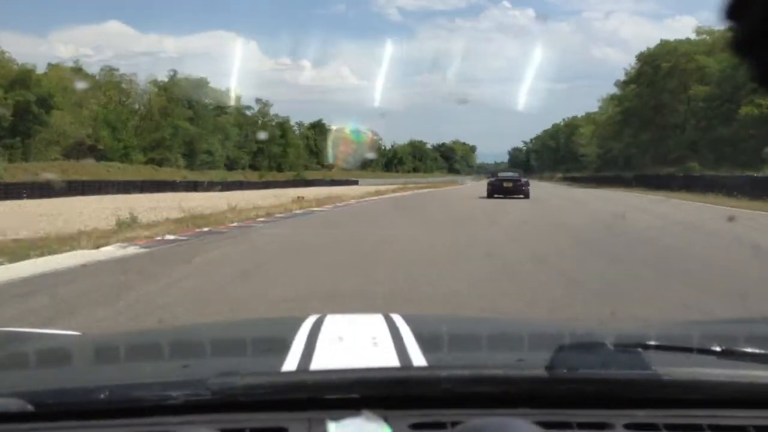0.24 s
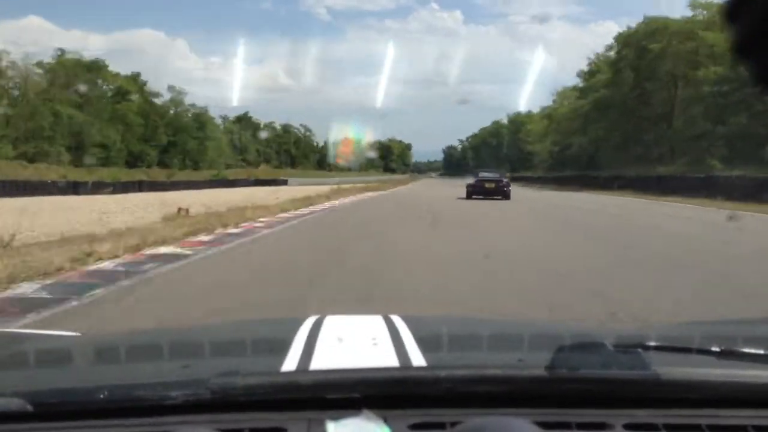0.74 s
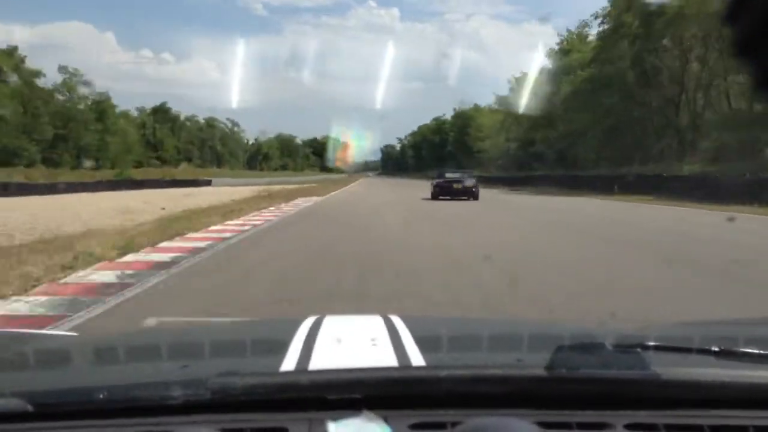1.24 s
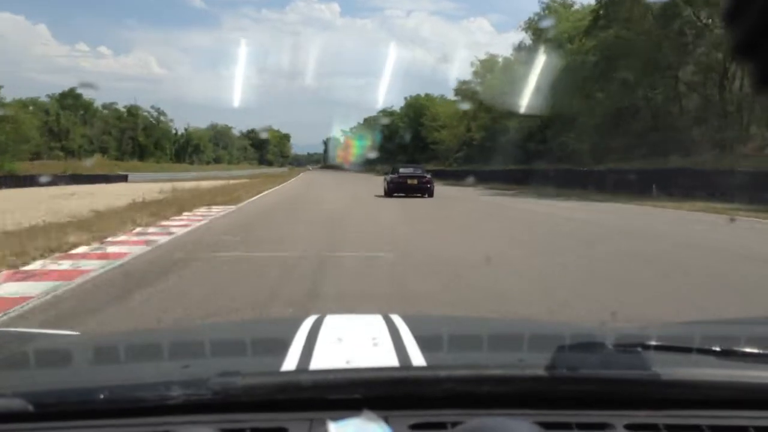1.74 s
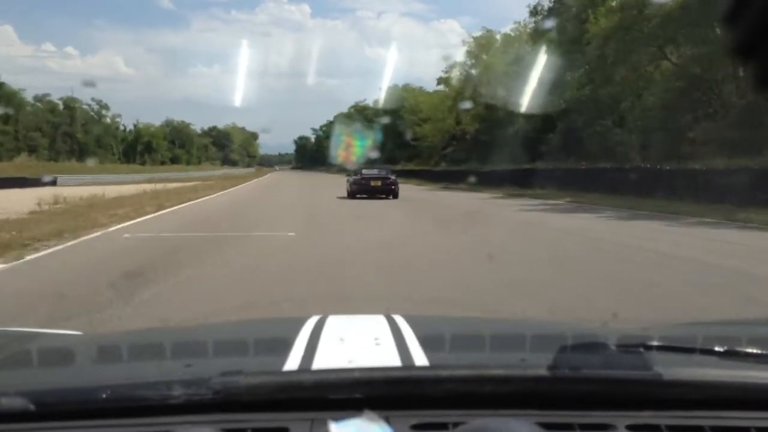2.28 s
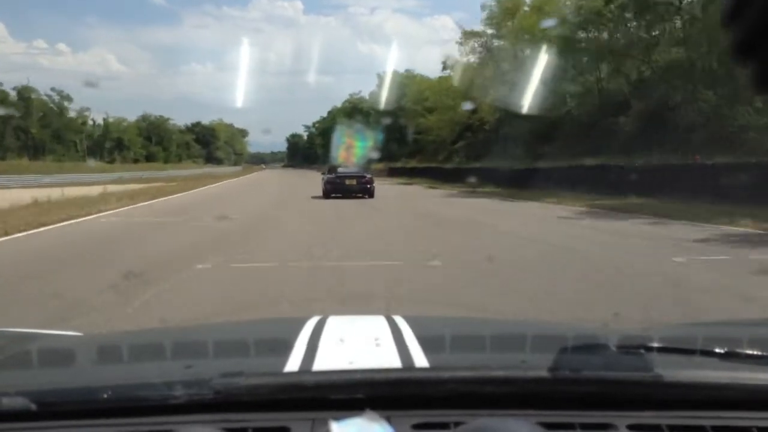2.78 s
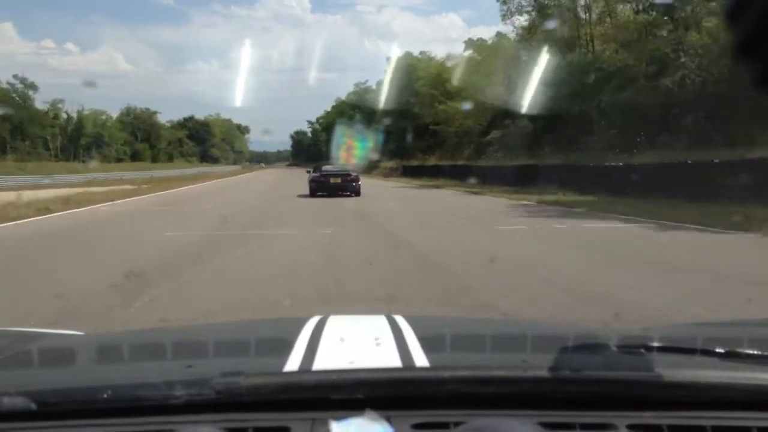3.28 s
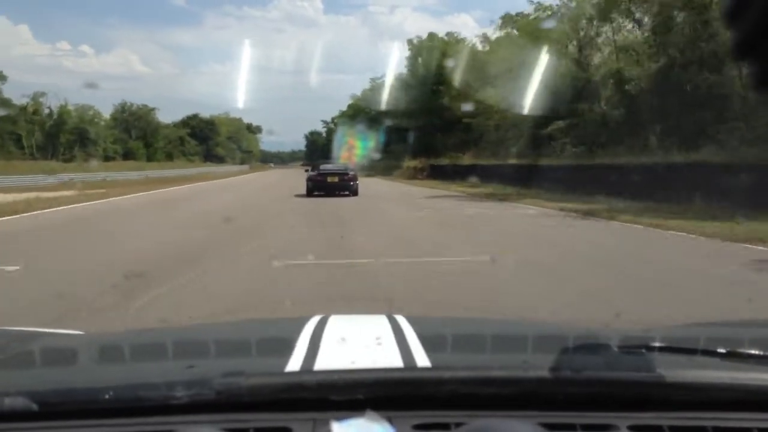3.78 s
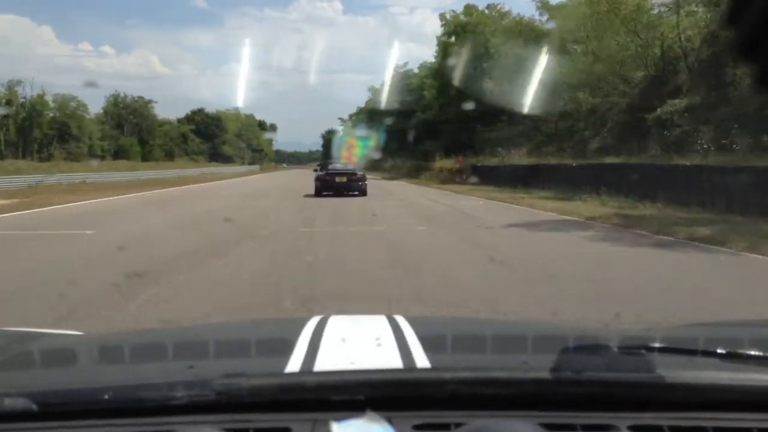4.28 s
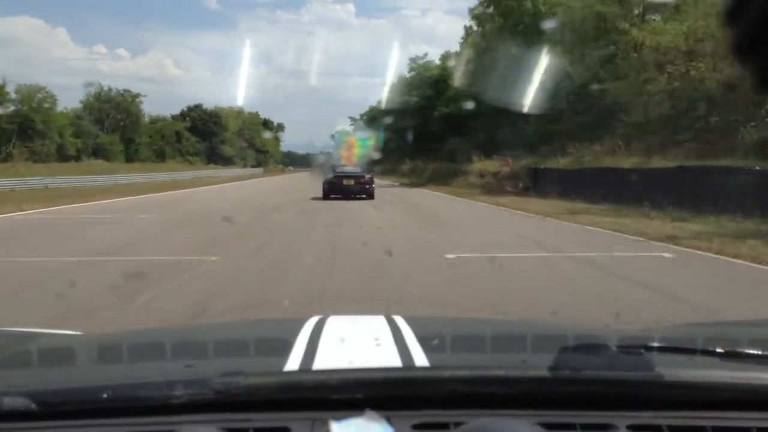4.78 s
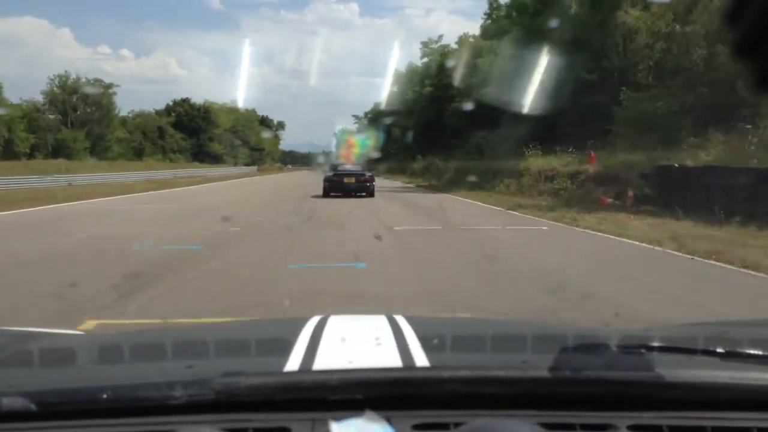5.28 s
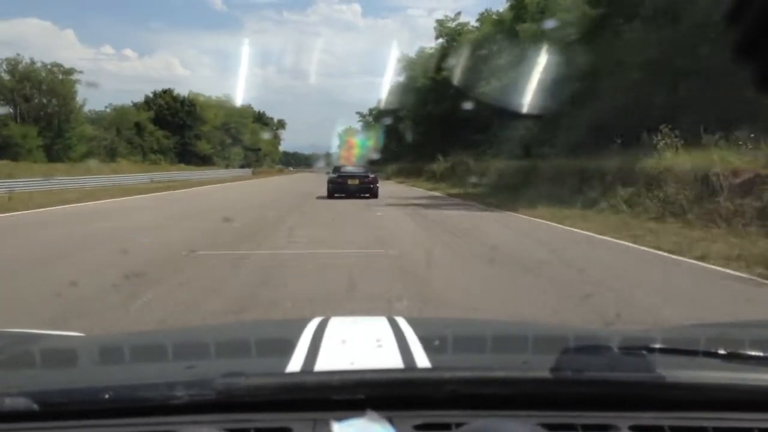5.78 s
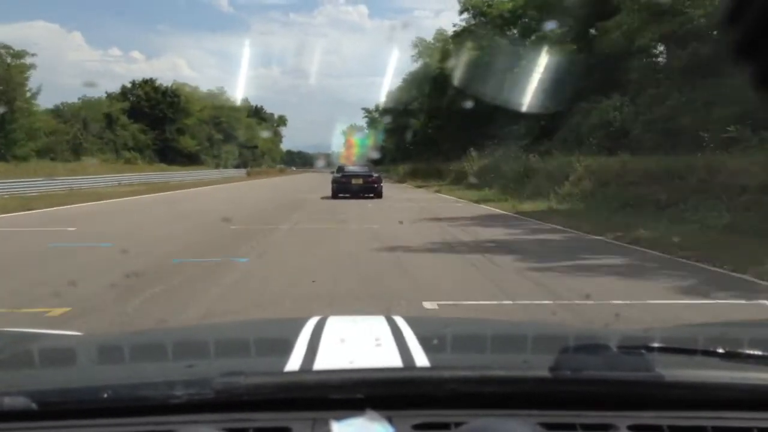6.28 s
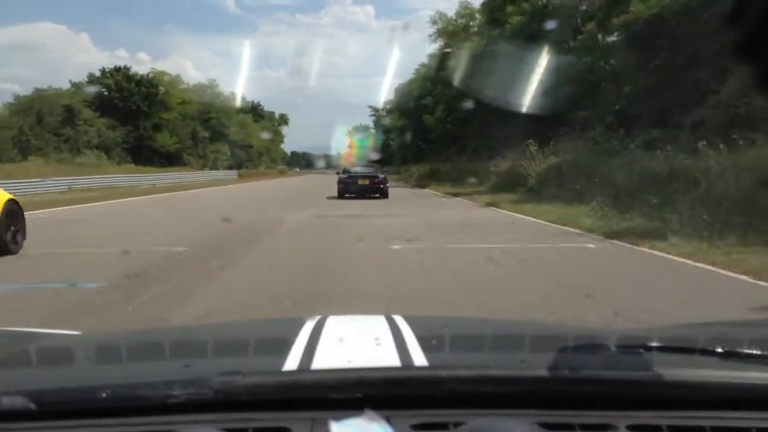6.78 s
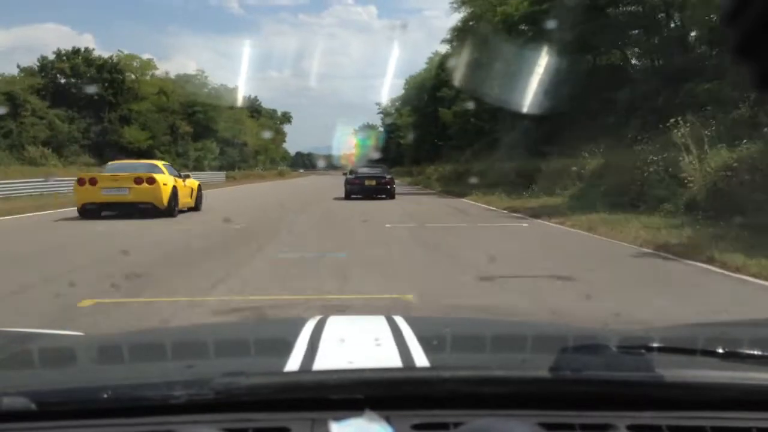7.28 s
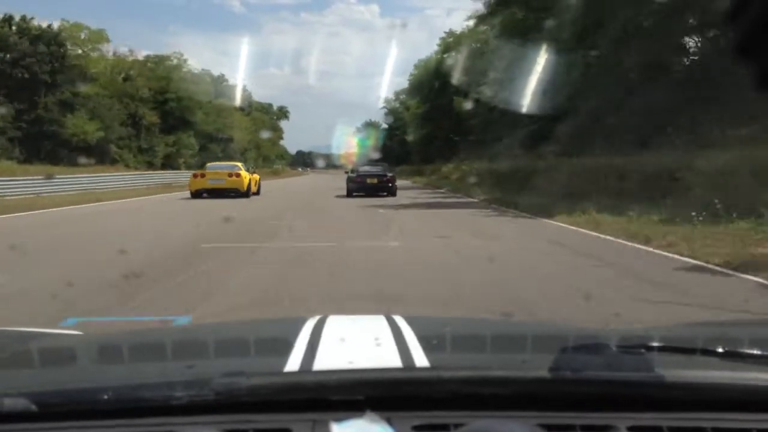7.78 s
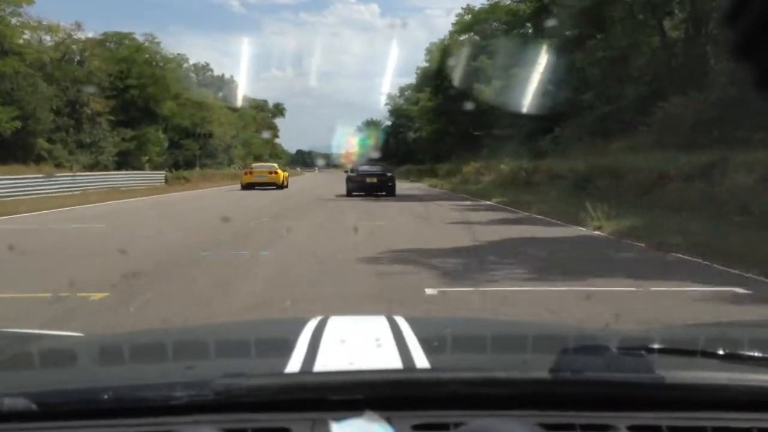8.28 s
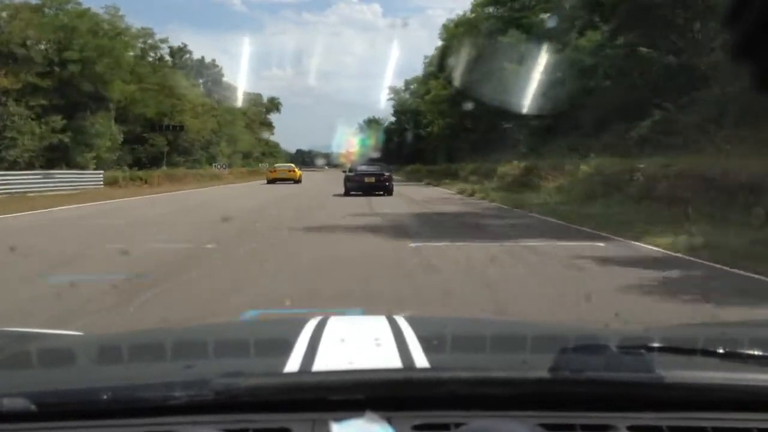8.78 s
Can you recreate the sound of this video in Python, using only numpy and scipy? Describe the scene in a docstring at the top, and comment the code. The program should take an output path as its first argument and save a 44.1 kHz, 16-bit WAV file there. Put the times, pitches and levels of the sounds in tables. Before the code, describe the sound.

Inside a race car, the engine revs high and changes up over tyre rumble and wind, then a V8 roars past and pulls away.

```python
"""A race car's engine, heard from inside: its firing booms at high revs, then it changes up and runs on.
The tyres rumble on the asphalt, wind hisses, whistles and short knocks come and go and loose trim rattles.
A V8 roars past with a rush of air, dropping in pitch. Its driver lifts off, then pulls away in a higher
gear. A limiter turns everything down as the V8 passes and slowly lets the level back up."""
import sys
import numpy as np
from scipy import signal
from scipy.fft import rfft, irfft
from scipy.io import wavfile
from scipy.ndimage import uniform_filter1d, minimum_filter1d

SR = 44100
rng = np.random.default_rng(int(sys.argv[2]) if len(sys.argv) > 2 else 0)


def master(y):
    """Save y as 16-bit WAV."""
    cut = np.clip(np.atleast_2d(y).T, -1, 1)
    pcm = np.round(cut * 32767)  # scale
    wavfile.write(sys.argv[1], SR, pcm.astype(np.int16))


N = 399105
T = np.arange(N) / SR

# road rumble in the cabin (frequency [Hz], relative level [dB])
ROAD_SPECTRUM = [(25, -46), (60, -12.5), (80, -27), (105, -5), (135, -0.5), (165, 5), (200, -4.5),
                 (280, -2), (400, -9), (620, -13), (780, -17), (1100, -17), (1600, -26.5), (3000, -53)]
# stretches of coarser asphalt (start [s], end [s], rise of the tyre hum [dB])
COARSE_ASPHALT = [(2.343, 4.35, 9.5), (5.1, 6.3, 7)]
# wind round the body (frequency [Hz], relative level [dB])
WIND_SPECTRUM = [(400, -19), (1000, -1.5), (1700, 1.5), (2500, -0.5), (3600, -5), (5200, -7), (7800, -10),
                 (9800, -19.5), (12500, -21), (15000, -39)]
# gusts and lulls (time [s], half length [s], level change [dB])
WIND_GUSTS = [(.35, 0.43, 4), (1.57, 0.054, 3), (2.87, 0.094, 3.5), (7.62, 0.13, -1), (7.88, 0.11, 1.5)]
# whistles, squeals, whines and short knocks
# (start [s], end [s], first pitch [Hz], last pitch [Hz], width [Hz], level [dB])
STRAY_TONES = [(0, .35, 11900, 11750, 120, -57), (0.486, .55, 2200, 2210, 18, -35),
               (.5, 1.08, 11700, 11250, 120, -58), (1.16, 1.25, 2593, 2620, 120, -35),
               (1.24, 1.722, 1008, 940, 56, -36.5), (1.505, 1.555, 980, 982, 25, -27),
               (1.545, 1.578, 1290, 1320, 90, -28), (1.833, 1.978, 436, 431, 10.8, -24.5),
               (2.358, 2.4, 900, 860, 110, -29), (2.304, 4.697, 940, 900, 50, -36.5),
               (6.299, 7.8, 1660, 1728, 13, -40.3)]
# the sound of loose trim (frequency [Hz], relative level [dB])
TRIM_SPECTRUM = [(1500, -15), (4000, -2), (7000, 5), (10000, -2), (14000, -4), (15500, -13.5)]
# trim rattles (time [s], level [dB], rise [s], time to fade by 60 dB [s])
TRIM_RATTLES = [(.326, -23.5, 0.0057, 0.11), (.36, -27.5, 0.012, .17), (.427, -42, .006, .15),
                (.741, -30.5, .007, .12), (1.197, -35, 0.0085, 0.18), (3.47, -38, .008, .12),
                (3.551, -43, .003, .08), (4.39, -41, .015, 0.16), (4.558, -40, .003, 0.075),
                (4.692, -38, .003, .06), (5.023, -33, .007, 0.15), (5.162, -43, .008, 0.096),
                (5.223, -30.5, 0.009, 0.13), (7.791, -22, .002, 0.04), (7.858, -32, 0.0032, .05),
                (8.828, -41, 0.0038, 0.11)]

# tones of the V8's intake, exhaust and far drone (multiple of its cycle rate [x], relative level [dB])
INTAKE_TONES = [(3, -9.5), (5, -5.5), (6, -2), (7, -24)]
EXHAUST_TONES = [(4, -2), (8, 3.5), (9, 3.5), (11, -9), (12, 0.5), (13, -19), (16, 1), (17, 1), (21, 0),
                 (22, -19), (25, -10)]
AWAY_TONES = [(4, -15), (5, -2.5), (8, 4), (10, -9.5), (12, -19), (13, -21)]
# the V8's intake roar, exhaust rasp and rushing air (frequency [Hz], relative level [dB])
ROAR_SPECTRUM = [(130, -36), (200, -6), (290, 3.5), (440, -3.5), (700, -25), (1600, -19), (2400, -20),
                 (3400, -41), (6000, -47)]
RASP_SPECTRUM = [(50, -31), (150, -7), (450, -21), (660, 3.5), (810, -3.5), (920, -2), (1080, 1),
                 (1400, -4), (1750, -11.5), (2400, -8.5), (4000, -18), (9000, -23.5)]
RUSH_SPECTRUM = [(800, -15), (2400, -17), (3300, -2), (4200, -3), (5300, 4), (6800, -1), (8500, -5),
                 (10000, -15.5), (12500, -12), (15000, -14)]
# the far drone dips briefly (time [s], half length [s], level change [dB])
DRONE_DIPS = [(8.38, .07, -7.5), (8.79, .03, -7), (8.92, .03, -9)]

# our engine's overtones in three patterns: 0 high revs, 1 taking up the drive, 2 steady pull
# (multiple of the crank's turning rate [x], level in 0 [dB], level in 1 [dB], level in 2 [dB])
ENGINE_OVERTONES = [(3, -34.5, -26.5, -41), (4, -27, -42, -27), (5, -26.5, -42, -45),
                    (6, -30.5, -25.5, -26.5), (7, -35.5, -35.5, -32), (8, -36.5, -31.5, -34.5),
                    (9, -37, -36, -33), (10, -43, -33.5, -38), (11, -40.5, -38, -56),
                    (12, -38.5, -48, -41.5), (13, -42.5, -42, -44), (18, -42, -47, -47)]
# valve clatter and the hiss of air drawn in (frequency [Hz], relative level [dB])
CLATTER_SPECTRUM = [(700, -36), (860, 7), (1030, -9), (1220, 4), (1450, -8), (1650, -1.5), (1900, -13),
                    (2200, -2.5), (2750, -8.5), (3200, -16), (3700, -11), (5000, -28.5)]
# pitches at which the cabin air rings (frequency [Hz], width [Hz], boost [dB])
CABIN_RESONANCES = [(133.5, 34.4, 14.5), (430, 37, 3), (593, 29, 7.5)]
# engine speed in the high gear (time [s], firing rate [Hz])
HIGH_GEAR_SPEED = [(2.0, 101.4), (2.85, 101.6), (4.16, 97.76), (4.5, 97.35), (8.8, 99.42)]
# the driver goes full throttle, lifts for the gear change, presses again, eases, holds and eases again
# (start [s], time taken [s], boom [dB], overtone gain [dB], clatter [dB], overtone pattern [0 to 2])
PEDAL_MOVES = [(-.1, .1, -18.5, 3, -33, 0), (.45, .55, -18.5, 0.5, -34, 0),
               (1.15, .08, -24.5, -12.5, -35, 0), (1.35, 0.49, -26, -15, -45, 0.83),
               (1.9, 0.19, -23.5, 0, -39.5, 1), (2.4, 0.25, -25, -7, -56, 1.25),
               (4.55, 0.36, -26, -.5, -54, 2), (7.9, 0.48, -26.5, -7, -48, 1.85)]
# the boom dips briefly (time [s], half length [s], level change [dB])
ENGINE_DIPS = [(1.216, 0.012, -15), (1.365, 0.065, -6.5), (1.85, .03, -10), (2.88, 0.19, -6),
               (4.34, 0.046, -6)]

SWELL_S, SWELL_HALF_S = 6.87, 0.61  # road and wind noise swell while the limiter turns the sound down
CLUTCH_S, FLARE_S = 1.17, .08  # when our clutch opens, and how long the revs take to jump


def amp(db):
    """Turns decibels into a gain to multiply by."""
    return 10 ** (np.asarray(db) / 20)


def unit(x):
    """Scales a signal to an average strength (rms) of 1."""
    return x / np.sqrt(np.mean(x ** 2) + 1e-20)


def ramp(start, length):
    """Rises from 0 to 1 and stays there."""
    return np.clip((T - start) / length, 0, 1)


def swells(rows):
    """Bell-shaped rises and dips of a level, in dB."""
    return sum(db * np.exp(-((T - s) / half) ** 2) for s, half, db in rows)


def drift(rate_hz):
    """A smooth random wobble, mostly slower than the given rate."""
    hz = np.fft.rfftfreq(4096, N / SR / 4096)
    slow = irfft(rfft(rng.standard_normal(4096)) / (1 + (hz / rate_hz) ** 4))
    return np.interp(T, np.linspace(0, T[-1], 4096), unit(slow))


def noise(spectrum, patchy_db):
    """Churning noise: a spectrum broken into brief louder and softer patches."""
    real, imag, patches = rng.standard_normal((3, N // 512 + 5, 1025))
    patches = unit(uniform_filter1d(uniform_filter1d(patches, size=5, axis=0), size=14, axis=1))
    hz, db = np.transpose(spectrum)
    colour = amp(np.interp(np.log(np.fft.rfftfreq(2048, 1 / SR) + 1), np.log(hz), db))
    frames = (real + 1j * imag) * colour * amp(patchy_db * patches)
    return unit(signal.istft(frames.T, nperseg=2048, noverlap=1536)[1][:N])


def tone(hz, rough, width_hz):
    """A tone that follows a pitch curve; roughness smears part of it over a narrow band."""
    angle = 2 * np.pi * (np.cumsum(hz) / SR + rng.random())
    wave = (np.sqrt(2) + rough * drift(width_hz)) * np.cos(angle)
    wave += rough * drift(width_hz) * np.sin(angle)
    return wave / np.sqrt(1 + rough ** 2)


def tone_stack(hz, multiples, rough, width_hz):
    """Tones at multiples of one engine speed, rising and falling together."""
    return unit(sum(amp(db) * tone(k * hz, rough, width_hz) for k, db in multiples))


def road():
    """The asphalt rumbles and keeps the air ringing in the cabin and inside the tyres."""
    edge_s = 0.033
    coarse_db = sum(db * (ramp(start, edge_s) - ramp(end, edge_s)) for start, end, db in COARSE_ASPHALT)
    level_db = -20.3 + 0.097 * coarse_db + swells([(SWELL_S, SWELL_HALF_S, 3)])
    rumble = noise(ROAD_SPECTRUM, patchy_db=1.5) * amp(.5 * drift(15))
    cabin_boom = amp(-11.5) * tone(hz=np.full(N, 134.5), rough=1.25, width_hz=2.4)
    tyre_hum = tone(hz=np.full(N, 230), rough=0.31, width_hz=7.5)
    return amp(level_db) * (rumble + cabin_boom) + amp(-33 + coarse_db) * tyre_hum


def wind():
    """Air hisses at the window seals, fluttering and swelling in gusts."""
    level_db = -38 + swells(WIND_GUSTS) + swells([(SWELL_S, SWELL_HALF_S, 2.5)])
    return noise(WIND_SPECTRUM, patchy_db=1.0) * amp(level_db + 0.8 * drift(27))


def whistles_and_knocks():
    """Fuzzy tones swell, slide a little and fade, heard as whistles, squeals, whines and short knocks."""
    out = np.zeros(N)
    for start, end, first_hz, last_hz, width_hz, db in STRAY_TONES:
        progress = ramp(start, end - start)
        swell = np.sqrt(abs(np.sin(np.pi * progress)))
        hz = first_hz + (last_hz - first_hz) * progress
        out += amp(db) * swell * tone(hz, rough=width_hz / 20, width_hz=width_hz)
    return out


def trim_ticks(per_s=7, fade_s=.04):
    """The road shakes faint, random ticks out of the trim."""
    knocks = (rng.random(N) < per_s / SR) * amp(3 * np.minimum(rng.exponential(1, N), 2))
    fading = signal.lfilter([1], [1, -amp(-60 / (fade_s * SR))], knocks)
    return amp(-49) * fading * noise(TRIM_SPECTRUM, patchy_db=5)


def trim_rattles(snap_rise_s=0.0017):
    """Loose trim chatters when it touches softly and gives one bright snap when it hits hard."""
    rustle = noise(TRIM_SPECTRUM, patchy_db=0.0)
    chatter = rustle * unit(amp(1.6 * drift(250)))
    snap = unit(np.diff(np.diff(rustle, prepend=0), prepend=0))  # tilts the noise toward the treble
    out = np.zeros(N)
    for s, db, rise_s, fade_s in TRIM_RATTLES:
        hardness = min(snap_rise_s / rise_s, 1) ** 2
        burst = ramp(s, rise_s) * amp(db - 60 * np.maximum(T - s - rise_s, 0) / fade_s)
        out += burst * ((1 - hardness) * chatter + hardness * snap)
    return out


def going_by(half_s, peak_db, steepness, nearest_s=6.5):
    """A passing sound swells and fades; at steepness 1, twice the distance gives half the gain."""
    return amp(peak_db) / np.hypot(1, (T - nearest_s) / half_s) ** steepness


def doppler(nearest_s, hz, climb_hz_per_s=.9, drop_share=0.0998, drop_s=0.0896):
    """The V8's pitch creeps up as it gains speed and drops as it goes by."""
    gone = (1 + np.tanh((T - nearest_s) / (2 * drop_s))) / 2
    return (hz + climb_hz_per_s * (T - nearest_s)) * (1 - drop_share * gone)


def v8_passing(lift_s=6.612, lift_db_per_s=289, lift_db=13.5):
    """Intake drone, barking exhaust and a rush of air, all cut short as the driver lifts off."""
    nose_hz = doppler(nearest_s=6.45, hz=49.38)  # engine cycles a second; the nose goes by first
    tail_hz = doppler(nearest_s=6.61, hz=50.3)
    exhaust_pulses = 1 + .35 * np.cos(2 * np.pi * np.cumsum(4 * tail_hz) / SR)  # four cylinders a side
    intake = tone_stack(nose_hz, INTAKE_TONES, rough=0.2, width_hz=13.0)
    intake *= going_by(half_s=0.19, peak_db=-8.5, steepness=1.16)
    roar = noise(ROAR_SPECTRUM, patchy_db=4.0) * going_by(half_s=.3, peak_db=-19.5, steepness=1.3)
    exhaust = tone_stack(tail_hz, EXHAUST_TONES, rough=0.62, width_hz=53.0)
    exhaust *= going_by(half_s=0.39, peak_db=-9, steepness=4.5)
    rasp = noise(RASP_SPECTRUM, patchy_db=3.0) * going_by(half_s=0.33, peak_db=-13, steepness=2.5)
    rush = noise(RUSH_SPECTRUM, patchy_db=4.0) * going_by(half_s=0.1029, peak_db=-8.5, steepness=2)
    # the body blocks a little of the sound until the V8 draws level with the side window
    shade = amp(-1.5 * (1 - ramp(6.01, 0.039)))
    lift_off = amp(-np.clip(lift_db_per_s * (T - lift_s), 0, lift_db))
    return (intake + roar + shade * (exhaust + exhaust_pulses * rasp + rush)) * lift_off


def v8_pulling_away(start_s=7.72, climb_hz_per_s=1.65):
    """The V8 drones farther ahead, back on the throttle, its pitch climbing steadily."""
    cycle_hz = 34.7 + climb_hz_per_s * (T - start_s)
    gain = ramp(start_s, .14) * amp(-21 + swells(DRONE_DIPS))
    return gain * tone_stack(cycle_hz, AWAY_TONES, rough=0.37, width_hz=8.4)


def cabin_gain(hz):
    """The cabin boosts a tone that comes near a pitch at which its air rings."""
    return amp(sum(db / (1 + (2 * (hz - ring) / width) ** 2) for ring, width, db in CABIN_RESONANCES))


def pedal():
    """Each pedal move glides the engine's sound to new settings, which then hold."""
    settings = np.outer(PEDAL_MOVES[0][2:], np.ones(N))
    for start, length, *goal in PEDAL_MOVES[1:]:
        settings += (np.array(goal)[:, None] - settings) * ramp(start, length)
    return settings


def firing_rate(start_hz=129.48, top_hz=144.1, climb_s=.85, flare_hz=9, sink_s=.23):
    """Firings a second: they climb in low gear, jump as the clutch opens, then sink to the high gear."""
    low_gear = top_hz + (start_hz - top_hz) * np.exp(-T / climb_s) + flare_hz * ramp(CLUTCH_S, FLARE_S)
    high_gear = np.interp(T, *np.transpose(HIGH_GEAR_SPEED))
    since_change_s = np.maximum(T - CLUTCH_S - FLARE_S, 0)
    return high_gear + (low_gear - high_gear) * np.exp(-since_change_s / sink_s)


def engine():
    """Our engine's firing makes a boom, rougher overtones that follow the pedal and pulsing clatter."""
    firing_hz = firing_rate()
    crank_hz = firing_hz / 2  # two firings for each turn of the crank
    boom_db, overtones_db, clatter_db, pattern = pedal()
    changing_gear = ramp(CLUTCH_S, FLARE_S) - ramp(CLUTCH_S + .7, FLARE_S)
    boom = tone(firing_hz, rough=.042 + 0.26 * changing_gear, width_hz=30)  # clean under power
    out = amp(boom_db + swells(ENGINE_DIPS)) * cabin_gain(firing_hz) * boom
    for k, *pattern_dbs in ENGINE_OVERTONES:
        level_db = overtones_db + np.interp(pattern, np.arange(3), pattern_dbs)
        # uneven firing smears the higher overtones more
        overtone = tone(k * crank_hz, rough=0.07 * k, width_hz=19)
        out += amp(level_db) * cabin_gain(k * crank_hz) * overtone
    crank_angle = 2 * np.pi * np.cumsum(crank_hz) / SR
    pulsing = 1 + 0.22 * np.cos(2 * crank_angle) + 0.17 * np.cos(crank_angle)
    return out + amp(clatter_db) * pulsing * noise(CLATTER_SPECTRUM, patchy_db=3.0)


def scene():
    """Everything heard in the cabin, in one channel."""
    mix = engine() + road() + wind() + whistles_and_knocks() + v8_passing() + v8_pulling_away()
    return (mix + trim_rattles() + trim_ticks())[None]


def record(dry, ceiling_db=-3.0, recovery_db_per_s=6.5, top_hz=15300):
    """A limiter turns down just before loud peaks and recovers slowly; the highest treble is cut."""
    peak_db = 20 * np.log10(abs(dry[0]) + 1e-9)
    recovery_db = T * recovery_db_per_s
    held_peak_db = np.maximum.accumulate(peak_db + recovery_db) - recovery_db
    over_db = np.maximum(held_peak_db - ceiling_db, 0)
    gain_db = uniform_filter1d(minimum_filter1d(-over_db, size=100), size=100)
    treble_cut = signal.firwin(1023, top_hz, window=("kaiser", 9), fs=SR)
    return signal.oaconvolve(dry * amp(gain_db), treble_cut[None], "same")


dry = scene()
out = record(dry)
master(out)
```